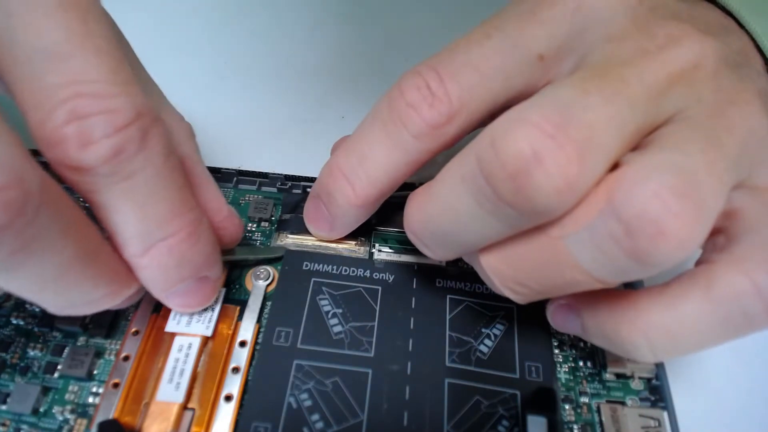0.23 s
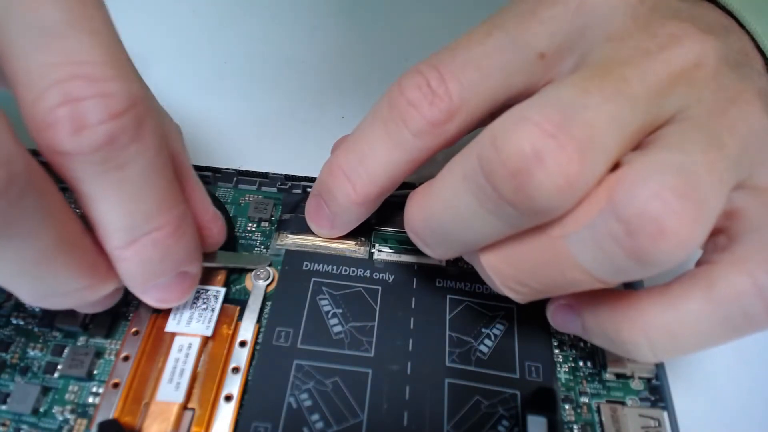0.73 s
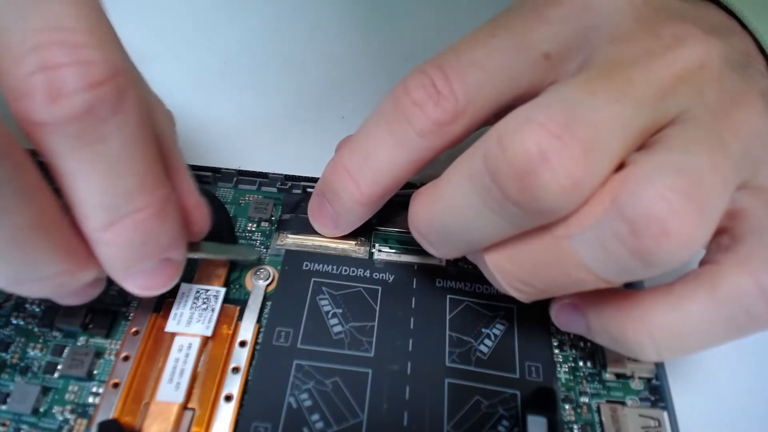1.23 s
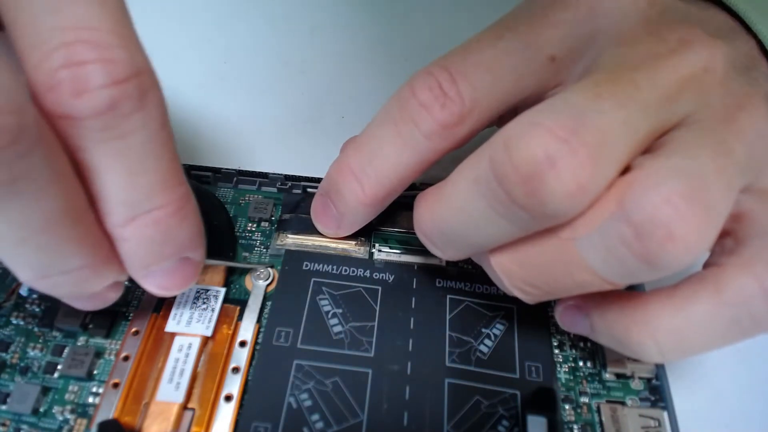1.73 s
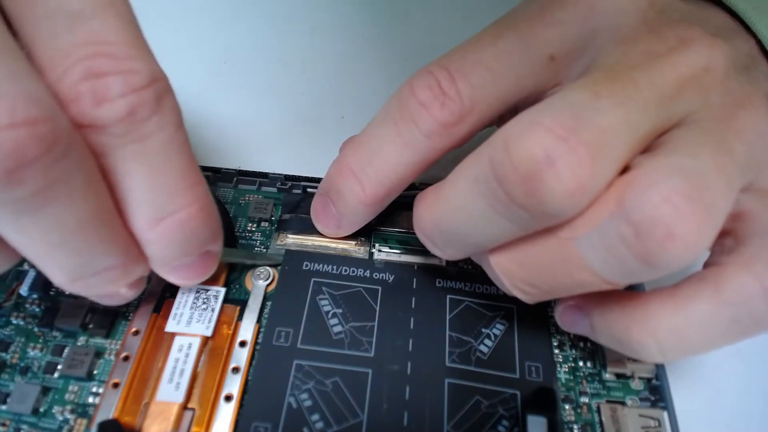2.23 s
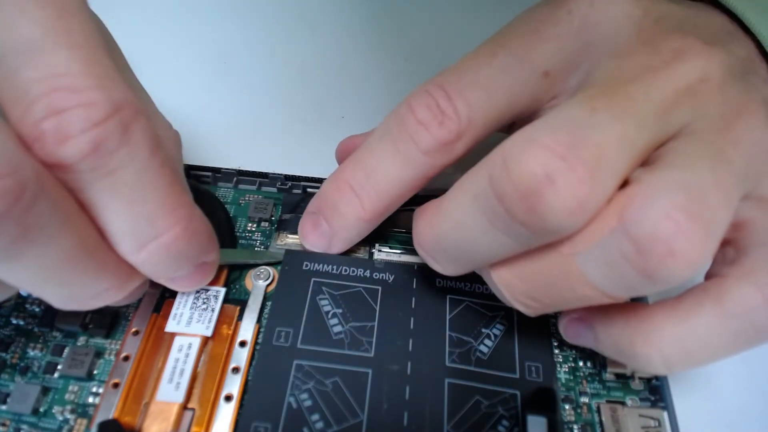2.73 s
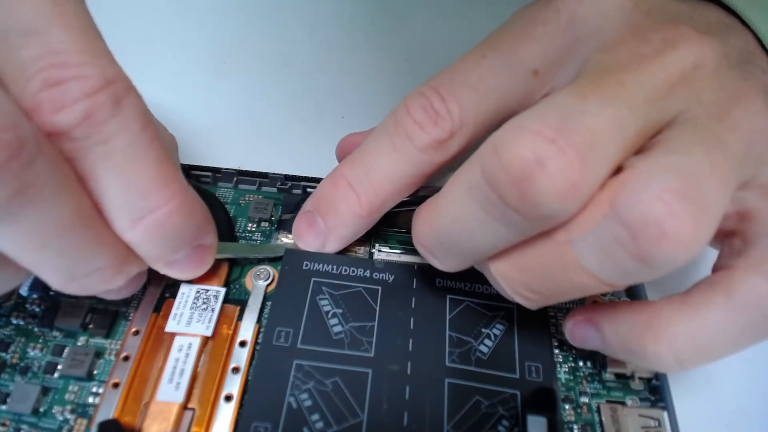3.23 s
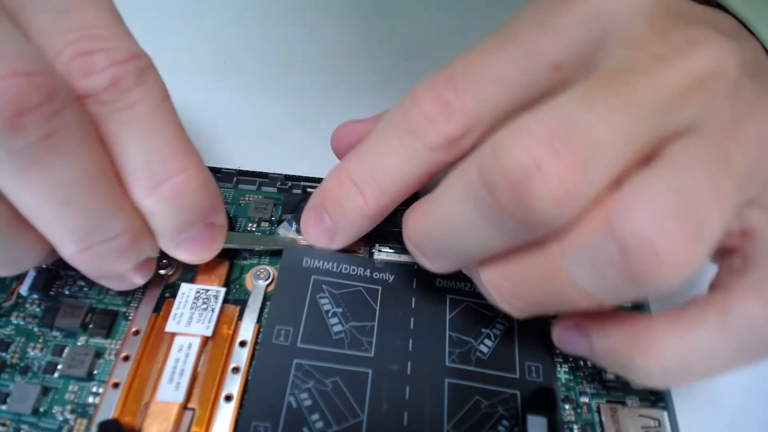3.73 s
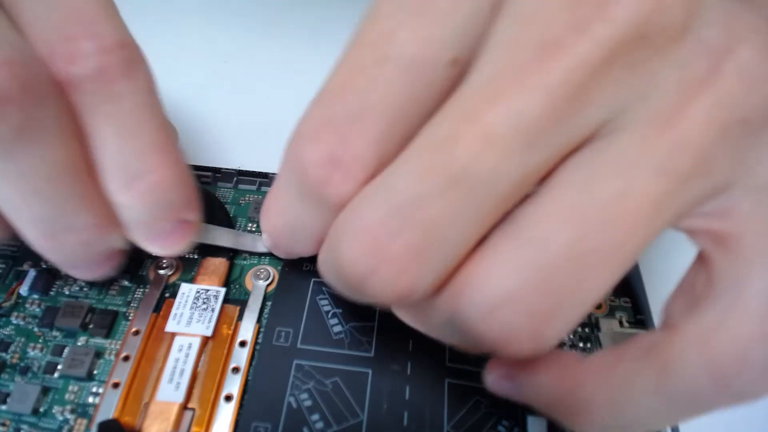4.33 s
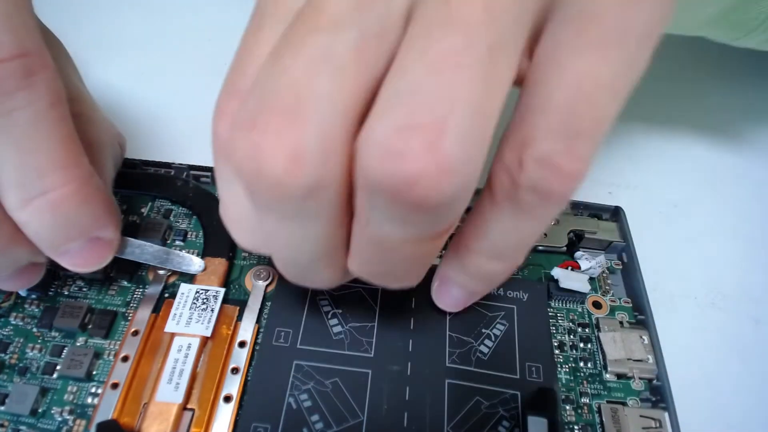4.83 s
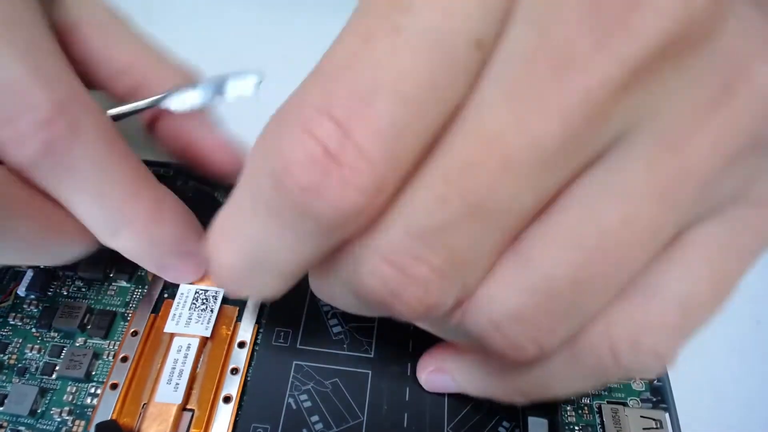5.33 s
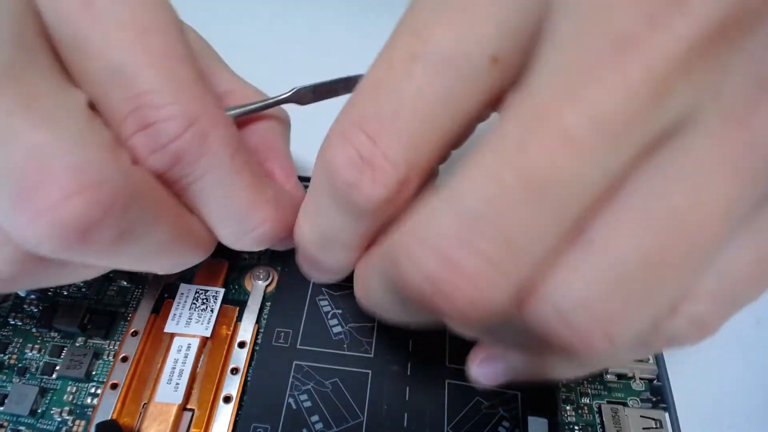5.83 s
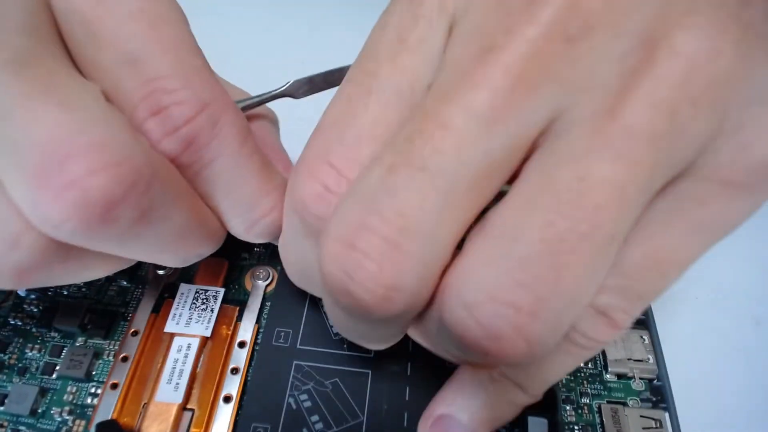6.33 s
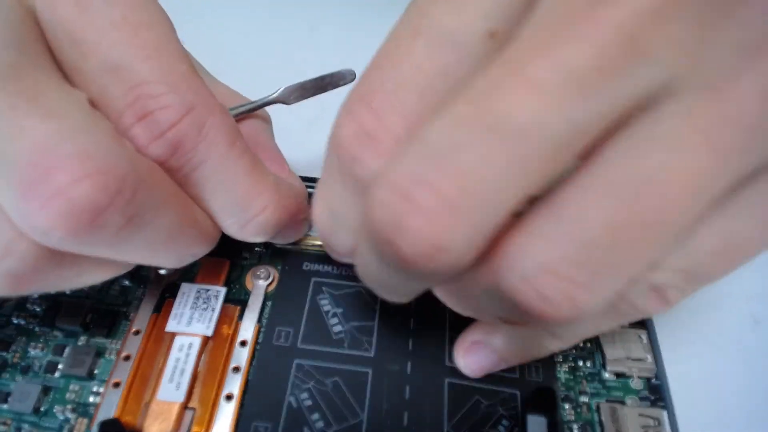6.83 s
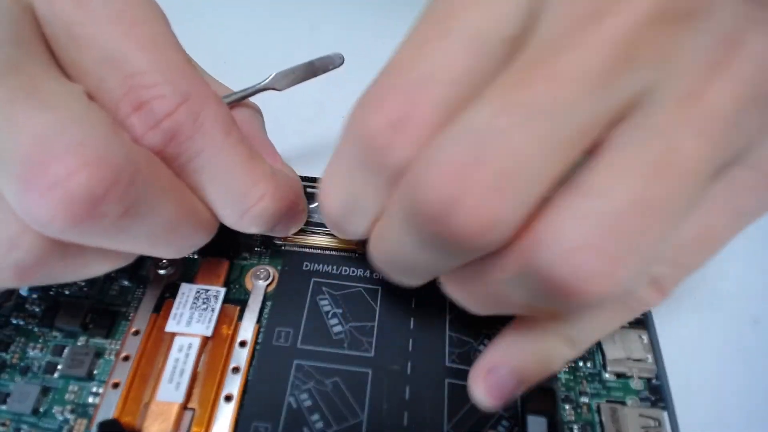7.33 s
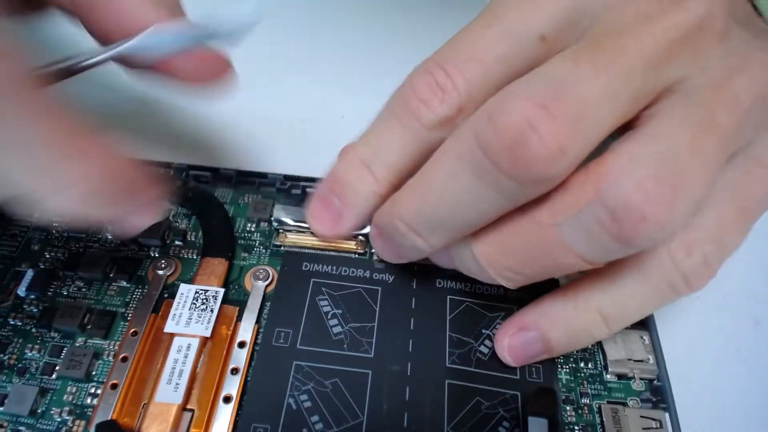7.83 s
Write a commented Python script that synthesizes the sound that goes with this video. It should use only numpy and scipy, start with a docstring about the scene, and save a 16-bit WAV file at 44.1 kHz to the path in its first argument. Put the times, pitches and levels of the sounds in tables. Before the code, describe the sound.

Fingers work a flat cable and adhesive tape on a bare laptop board, heard very close. Faint clicks come first, a bright snap before the middle, then denser scraping, squeaky rubs and small knocks. A hard crack near the end stands far above everything, with a brief room tail. Quiet wavering machine hum and dark air noise lie underneath.

```python
"""Throughout, machines hum as wavering tones over shaped noise: air and microphone hiss.
Fingers and a metal spatula work a ribbon cable and sticky tape loose on a bare circuit board: first faint
clicks and rubs, a sharp click near 3.5 s, busier handling from 4.7 s, the loudest crack at 7.05 s, then less.
Rough force pulses (nails, tape) and stick-slip noise (skin, foil) drive damped board modes, with a faint rustle.
A small room answers each touch with early echoes and a diffuse tail; two capsules hear it in stereo."""
import sys
import numpy as np
from scipy import signal
from scipy.fft import rfft, irfft
from scipy.io import wavfile
from scipy.ndimage import uniform_filter1d

SR = 44100
rng = np.random.default_rng(int(sys.argv[2]) if len(sys.argv) > 2 else 0)


def log_audio(samples):
    """Write samples as a 16-bit WAV file to the path given in sys.argv[1]."""
    # one column per channel
    frames = np.atleast_2d(samples).T
    # limit to full scale, then quantise
    limited = np.clip(frames, -1, 1)
    pcm = np.round(limited * 32767).astype(np.int16)
    wavfile.write(sys.argv[1], SR, pcm)


def volts_from_db(level):
    """Convert decibel levels to linear amplitude ratios."""
    exponent = np.asarray(level, float) / 20
    return 10 ** exponent


N = 356724

# stereo width of the background, side over mid: [f/Hz, level/dB]
WIDTH = [(60, -25.5), (110, -10), (200, -16), (380, -22), (700, -6.5), (1290, -2.5), (2380, 2.5), (4400, 2),
         (8120, -13.5), (15000, -26)]
# rustle of skin and sleeves as the hands move: [t/s, rms level/dB]
RUSTLE_LEVEL = [(0, -91), (2, -90.5), (3.3, -89), (3.7, -75.5), (4.6, -82.5), (5.05, -81.5), (5.3, -79.5),
                (6.0, -80), (6.5, -69), (7, -76.5), (7.45, -77), (8.09, -83.5)]
# upper board modes in four groups: [f/Hz, relative level/dB, t60/s before the contact's damping]
BOARD = [
    [(1930, -4.5, 0.0038), (2250, 1.5, 0.007), (2692, -3, 0.0067)],
    [(3400, -4, .015), (3720, -0.5, 0.01), (4410, 4, 0.0095), (4430, 3.5, 0.011)],
    [(5680, -5.5, 0.016), (6040, 1, 0.0058), (6950, 2.5, 0.013)],
    [(7250, 6, 0.03), (7920, 1.5, 0.0082), (9200, 10, 0.0065), (9640, 5, 0.0073), (11500, -20, 0.026),
     (11300, -30, 0.0035)],
]
# centre pitch of each mode group: [f/Hz]
GROUP_HZ = [2250, 4100, 6300, 9000]


def along(table, hz):
    """Logarithmic pitch scale: read (f/Hz, value) points on a log-frequency axis."""
    f, v = np.transpose(table)
    return np.interp(np.log(np.maximum(hz, 1)), np.log(f), v)


def walk(rate):
    """Low-pass random process: a smooth wander of about rate turns a second, spread 1."""
    k = int(SR / rate)
    steps = np.repeat(rng.standard_normal(N // k + 1), k)
    w = uniform_filter1d(uniform_filter1d(steps, k), k)[:N]
    return w / w.std()


def air():
    """Filtered noise: independent mid and side spectra set the colour and stereo width of air and hiss."""
    # noise spectrum: [f/Hz, relative level per Hz/dB]
    spectrum = [(15, -32.5), (30, -7), (60, -4.5), (150, -15.5), (300, -12.5), (450, -19), (750, -23.5),
                (1200, -30.5), (1600, -34), (2500, -39.5), (4800, -47), (9400, -45), (13000, -50),
                (16000, -52)]
    mid_rms_db = -66
    hz = np.fft.rfftfreq(N, 1 / SR)
    mid, side = rfft(rng.standard_normal((2, N))) * volts_from_db(along(spectrum, hz))
    scale = volts_from_db(mid_rms_db) / irfft(mid, N).std()
    side = side * volts_from_db(along(WIDTH, hz))
    return scale * irfft([mid + side, mid - side], N)


def hum():
    """Beats and modulation: two near-equal tones beat; others waver in level and differ in phase by capsule."""
    # mains buzzes a hair apart: [f/Hz, rms level/dB]
    mains = [(120.0, -72), (120.24, -76)]
    # machine tones: [f/Hz, rms level/dB without waver, limit of the waver either way/dB]
    tones = [(57.6, -72.5, 3.5), (89, -84.5, 6), (171, -81, -4.5), (208.3, -77.5, 3), (235, -81.5, -0.5),
             (273, -85.5, 5), (324.3, -65, -0.4), (394.4, -79, 1), (492, -88, 4.5), (660, -87, 6),
             (726, -90, 2), (790, -86.5, 3.5), (927, -90.5, -0.5), (950, -87, 2.5), (1100, -92, 1.5),
             (1163, -92, 7), (1260, -99, 8), (1430, -95.5, 3.5), (1300, -93, 2), (1364, -88.5, 1.5),
             (1380, -88.5, -1.5), (1438, -85.5, -1.5), (1460, -89, 0.5)]
    in_phase_s = 1.95  # a moment when the two buzzes add
    t = np.arange(N) / SR
    buzz = sum(volts_from_db(db) * np.cos(2 * np.pi * hz * (t - in_phase_s)) for hz, db in mains)
    out = buzz * np.ones((2, 1))
    for hz, db, waver_db in tones:
        apart = np.arctan(volts_from_db(along(WIDTH, hz))) * np.array([[1], [-1]])
        level = volts_from_db(db + waver_db * np.tanh(walk(5.5)))
        phase = 2 * np.pi * (hz * t + rng.random()) + 0.19 * waver_db * walk(7.2)
        out = out + level * np.cos(phase + apart)
    return np.sqrt(2) * out  # rms to peak


def room(near, around):
    """Reverberation: echoes off table and hands, then a diffuse stereo tail that loses treble first."""
    # decay of the tail: [f/Hz, t60/s]
    decay = [(500, 0.84), (1500, 0.86), (4000, 0.54), (10000, 0.53)]
    # early echoes: [delay t/s, level/dB]
    reflections = [(.003, -10.5), (.0052, -11.5), (.0095, -19.5)]
    tail_db, build_up_s = -23, 0.029
    t = np.arange(SR) / SR
    tail, echoes = np.zeros((2, SR)), np.zeros((2, SR // 10))
    for hz in 250 * 2 ** np.arange(6):
        octave = signal.butter(2, [hz / np.sqrt(2), hz * np.sqrt(2)], "band", fs=SR, output="sos")
        noise = signal.sosfilt(octave, rng.standard_normal((2, SR)))
        tail += noise * np.exp(-np.log(1000) * t / along(decay, hz))
    tail *= 1 - np.exp(-t / build_up_s)
    tail *= volts_from_db(tail_db) / np.sqrt(np.sum(tail ** 2) / 2)
    for s, db in reflections:
        # the right channel hears each echo 3 samples after the left
        echoes[:, int(s * SR) + np.array([0, 3])] += volts_from_db(db) * np.eye(2)
    early = signal.fftconvolve(near[None], echoes, axes=1)[:, :N]
    late = signal.fftconvolve(around[None], tail, axes=1)[:, :N]
    return early + late


def rustle():
    """Granular friction: fine broad crackle, independent at the two capsules, comes and goes."""
    s, db = np.transpose(RUSTLE_LEVEL)
    grains = rng.standard_normal((2, N)) * volts_from_db(0.94 * rng.exponential(size=N))
    grains = signal.sosfilt(signal.butter(1, [1500, 6000], "band", fs=SR, output="sos"), grains)
    level_db = np.interp(np.arange(N) / SR, s, db) + 0.83 * walk(15)
    return grains / grains.std() * volts_from_db(level_db)


def add(track, s, sound):
    """Linear superposition: mix a sound in at s seconds."""
    i = int(s * SR)
    track[:, i:i + sound.shape[1]] += sound[:, :max(N - i, 0)]


def crack(ms, snap):
    """Sudden release: rough force swells for ms milliseconds (at least 0.2), lets go in one snap and dies."""
    peak = int(max(ms, .2) * SR / 1000)
    t = np.arange(SR // 25) / peak
    envelope = np.where(t < 1, t ** 1.6, np.exp(-1.6 * (t - 1)))
    force = rng.standard_normal(len(t)) * envelope
    force[peak] = snap * np.sqrt(peak)
    return force


def ring(push, modes, damping, direct_db):
    """Modal superposition: damped modes, varied a little by each touch, answer a force also heard directly."""
    t = np.arange(SR // 10) / SR
    spot = rng.standard_normal((len(modes), 2))
    response = np.zeros(len(t))
    for k, ((hz, db, t60), (a, b)) in enumerate(zip(modes, spot)):
        tone = np.sin(2 * np.pi * hz * (1 + 0.0096 * b) * t)
        decay = np.exp(-np.log(1000) * damping * t / t60)
        response += (-1) ** k * volts_from_db(db + 2.0 * a) * tone * decay
    response[0] = volts_from_db(direct_db)
    return signal.fftconvolve(push, response)


def radiate(ringing, force, lo_hz, hi_hz):
    """Radiated power: the ring up close, and equal energy over all directions, where the modes even out."""
    band = signal.butter(2, [lo_hz / 1.017, hi_hz * 1.035], "band", fs=SR, output="sos")
    force = np.pad(force, (0, len(ringing) - len(force)))
    near, around = signal.sosfiltfilt(band, [ringing, force], padtype=None)
    return np.array([near, around * np.linalg.norm(near) / np.linalg.norm(around)])


def favour(db, best_hz, fall_db):
    """Selective excitation: a mode group weakens with its distance from the pitch that the spot favours."""
    return db - max(fall_db, 0) * np.abs(np.log2(np.array(GROUP_HZ) / best_hz))


def touch(pushes, forces, levels_db, best_hz, measure, damping, direct_db, top_hz):
    """Modal excitation: a force drives each mode group, to its own level and mostly near the favoured pitch."""
    # lower edge of each mode group: [f/Hz]
    lower_edges = [1600, 3200, 5300, 7500]
    focus_db = 13.5  # fade per octave further away than the group's nearest mode
    edges = lower_edges + [top_hz]
    out = 0
    for push, force, modes, lo, hi, db in zip(pushes, forces, BOARD, edges, edges[1:], levels_db):
        away = np.abs(np.log2(np.array(modes)[:, 0] / best_hz))
        fade_db = focus_db * (away - away.min())
        focused = [(hz, mode_db - fade, t60) for (hz, mode_db, t60), fade in zip(modes, fade_db)]
        group = radiate(ring(push, focused, damping, direct_db), force, lo, hi)
        out = out + volts_from_db(db) * group / measure(group[0])
    return out


def rubs():
    """Stick-slip friction: dense uneven slips, in runs of shifting colour, swell and fade; skin damps the ring."""
    # rubs and peels: [nominal start t/s, nominal length/s, rms level/dB at the favoured pitch before group
    # trim, favoured f/Hz, fall-off/dB per octave]
    strokes = [(0.032,0.098,-88.5,2200,6.5), (0.261,0.11,-79,4100,23), (0.745,0.084,-81.5,3000,13),
               (0.86,0.048,-80,2930,14), (1.328,0.036,-68,2800,12), (2.079,0.035,-74.5,2250,11),
               (2.526,0.1,-86.5,4000,3), (3.446,0.015,-76.5,4200,9), (3.508,0.11,-85,5000,10),
               (3.758,0.14,-82,5900,1), (3.945,0.55,-83.5,2600,3), (4.442,0.12,-80,2620,8.5),
               (4.642,0.08,-83,2300,2.5), (4.724,0.042,-74,9000,4.5), (4.838,0.078,-82.5,2900,4.5),
               (4.93,0.068,-77.5,3470,10), (5.082,0.038,-66,6000,3.5), (5.121,0.024,-59,3580,10),
               (5.146,0.081,-74.5,3220,7.5), (5.323,0.034,-75.5,7800,3), (5.437,0.2,-75,3600,7),
               (5.478,0.037,-65,3300,11), (5.52,0.039,-71.5,7400,2), (5.59,0.13,-68.5,5840,9),
               (5.787,0.073,-80.5,3500,4.5), (5.896,0.09,-76,3000,8), (5.98,0.076,-78,2800,7.5),
               (6.053,0.119,-68.5,6200,8.5), (6.213,0.032,-71,5900,14), (6.277,0.058,-68,3870,8),
               (6.366,0.045,-56,3380,17), (6.398,0.04,-60,2250,5.5), (6.519,0.038,-46,2500,18.5),
               (6.541,0.035,-52.5,3300,14.5), (6.6,0.04,-52.5,2250,2), (6.63,0.12,-62,1900,4),
               (6.817,0.18,-79,2480,7), (7.49,0.024,-67.5,2900,4.5), (7.51,0.032,-76,2300,1.5),
               (7.562,0.037,-71.5,6600,3), (7.606,0.036,-64.5,8960,5), (7.791,0.058,-82,9000,1),
               (7.932,0.05,-79.5,6000,2.5), (7.975,0.038,-74,2300,2), (8.02,0.053,-81,3100,4)]
    # how readily each mode group answers a rub: [level/dB]
    group_db = [0.2, -0.4, -1.2, 0.2]
    out = np.zeros((2, N))
    for s, length, db, best_hz, fall_db in strokes:
        levels_db = favour(db, best_hz, fall_db) + group_db
        n = int(max(length, .005) * 1.5 * SR)  # the swell and fade reach past the nominal length
        slips = rng.standard_normal((len(BOARD), n)) * volts_from_db(2.0 * rng.exponential(size=n))
        run_db = 3.0 * rng.standard_normal((len(BOARD), n // 256 + 1))
        runs = volts_from_db(np.repeat(run_db, 256, axis=1)[:, :n])
        swell = np.sin(np.pi * np.linspace(0, 1, n) ** 0.73) ** 2.5
        force = slips * runs * swell
        stroke_rms = lambda g: np.sqrt(np.sum(g ** 2) / n)
        # a stroke that one group dominates squeaks in its modes; an even one is a plain hiss
        direct_db = 41 - 2.25 * fall_db
        sound = touch(force, force, levels_db, best_hz, stroke_rms,
                      damping=1.5, direct_db=direct_db, top_hz=10400)
        add(out, max(s - .2 * length, 0), sound)
    return out


def knocks():
    """Contact time and position: a blunter push rings mostly the mode that the spot favours."""
    # pushes: [t/s, peak level/dB, favoured f/Hz, rise of the push/ms, fall-off of other modes/dB per octave]
    pushes = [(1.307, -42, 2250, 2, 50), (1.321, -42, 2150, 3.2, 55), (5.123, -38, 2750, 6, 64),
              (5.124, -53, 634, 3.9, 27), (6.295, -54.5, 643, 3, 13), (6.405, -57.5, 664, 2, 16),
              (6.523, -36.5, 2170, 3, 29.5), (6.604, -39.5, 2096, 2, 19), (6.612, -43.5, 1340, 1.3, 35.5),
              (6.6129, -23.5, 1930, 2, 42), (7.053, -27.5, 760, .8, 9.5), (7.557, -56.5, 492, 2, 44)]
    # low bending modes: [f/Hz, relative level/dB, t60/s before the contact's damping]
    flex = [(378, -4, 0.045), (490, -2, 0.055), (620, -3, 0.049), (970, 0.5, 0.022), (1340, -2, 0.062)]
    out = np.zeros((2, N))
    for s, db, best_hz, ms, fall_db in pushes:
        modes = [(hz, mode_db - fall_db * abs(np.log2(hz / best_hz)), t60)
                 for hz, mode_db, t60 in flex + BOARD[0] + BOARD[1]]
        spread = 2 ** (9 / max(fall_db, 8))
        ringing = ring(crack(ms, snap=3.8), modes, damping=1.7, direct_db=-19.0)
        # few modes sound, so the room keeps their pitch
        body = radiate(ringing, ringing, best_hz / spread, best_hz * spread)
        add(out, s, volts_from_db(db) * body / np.abs(body[0]).max())
    return out


def ticks():
    """Random point process: faint clicks at chance moments, stronger while the rustle is."""
    count, over_rustle_db, scatter_db, fall_db = 30, 10, 3.0, 9  # fall-off per octave
    s, db = np.transpose(RUSTLE_LEVEL)
    when, size, pitch = rng.random((count, 3)).T
    when = when * (N / SR - .1)
    peak_db = np.interp(when, s, db) + over_rustle_db - scatter_db * np.log(1 - size)
    best_hz = GROUP_HZ[0] * 4 ** pitch
    return [(a, b, c, fall_db) for a, b, c in zip(when, peak_db, best_hz)]


def clicks():
    """Impulse response: short cracks ring the board's upper modes."""
    # nail, tool and tape: [t/s, peak level/dB at the favoured pitch before group trim, favoured f/Hz,
    # fall-off/dB per octave]
    cracks = [(0.6344,-59,2900,12.5), (0.86,-43,3120,25.5), (1.3086,-39,4400,29), (1.324,-41,4100,26),
              (1.7198,-63.5,2250,21), (2.0848,-49.5,2250,21), (2.579,-57,9000,3.5), (3.4719,-24.5,4900,9),
              (3.6655,-46.5,4340,14), (3.7017,-61.5,4000,16), (3.83,-43.5,5540,21), (3.9367,-56,6200,12),
              (4.7277,-48,9000,8), (4.737,-52,6300,11), (4.78,-43.5,8450,3.5), (4.789,-56,9000,7),
              (4.8277,-59,9000,4), (5.0744,-48,6460,4), (5.0931,-45.5,9000,8), (5.0971,-38,5130,11.5),
              (5.3348,-53.5,9000,6), (5.7104,-61,5000,2), (5.9383,-45,2300,14), (6.0515,-42,6460,4.5),
              (6.2037,-40,4650,7.5), (6.2761,-38.5,3400,10), (6.297,-36.5,4700,23), (6.335,-40,3800,12),
              (6.3675,-43.5,3860,17), (6.4059,-31,2730,15), (6.4136,-41,2300,23), (6.54,-35,3580,15),
              (6.6139,-25.5,2540,8.5), (6.6386,-43,3600,10), (7.0531,-9,3694,5.5), (7.0754,-37.5,3800,26),
              (7.1283,-28,3300,19), (7.4988,-39.5,4200,21), (7.5578,-39,6680,13.5), (7.6143,-42,2320,3),
              (7.6302,-54,4606,11), (7.7964,-58.5,9000,11)]
    # how readily each mode group answers a click: [level/dB]
    group_db = [-1.37, 0.75, -2, 2.5]
    out = np.zeros((2, N))
    for s, db, best_hz, fall_db in cracks + ticks():
        levels_db = favour(db, best_hz, fall_db) + group_db
        push = [crack(ms=1.1, snap=0.63)] * len(BOARD)
        flat = np.ones((len(BOARD), 1))  # one unit impulse a group
        sound = touch(push, flat, levels_db, best_hz, lambda g: np.abs(g).max(),
                      damping=1.97, direct_db=18, top_hz=12100)
        add(out, s, sound)
    return out


def scene():
    """Image source and spaced capsules: close hands, mirrored by the surface below, over the background."""
    bounce_s, bounce_db, near_side_db = .00048, -11.5, -17
    near, around = clicks() + knocks() + rubs()
    mirrored = volts_from_db(bounce_db) * np.roll(near, round(bounce_s * SR))
    near = (near + mirrored) / np.hypot(1, volts_from_db(bounce_db))
    side = volts_from_db(near_side_db) * np.roll(near, 6)  # 6 samples late, for the gap between the capsules
    direct = np.array([near + side, near - side])
    return direct + room(near, around) + rustle() + hum() + air()


def low_pass(x):
    """Removes everything above the highest recorded frequency."""
    return signal.sosfilt(signal.butter(12, 16550, fs=SR, output="sos"), x)


def record(dry):
    """Unity gain: the finished stereo mix is stored at the level at which it was summed."""
    return low_pass(dry)


dry = scene()
out = record(dry)
log_audio(out)
```